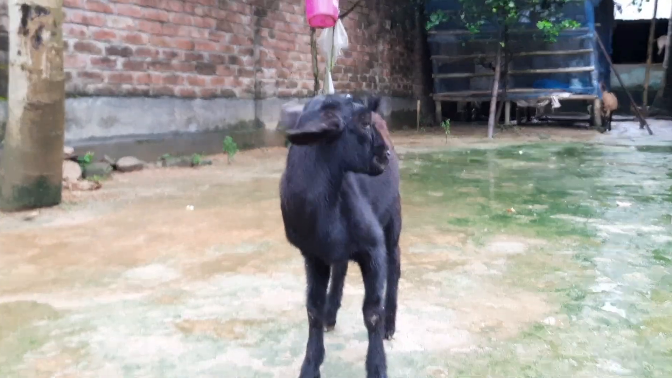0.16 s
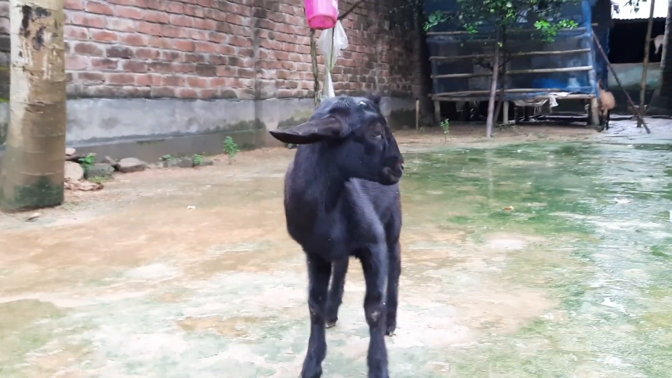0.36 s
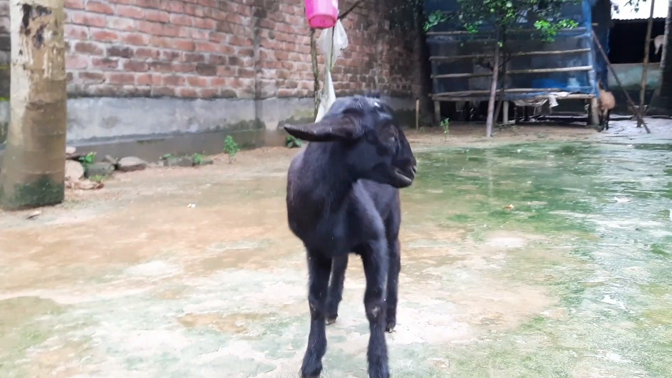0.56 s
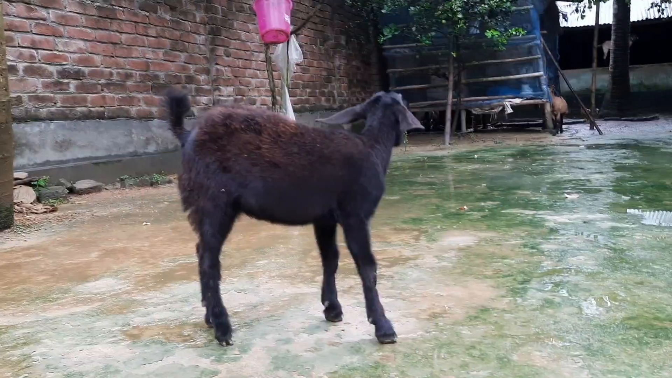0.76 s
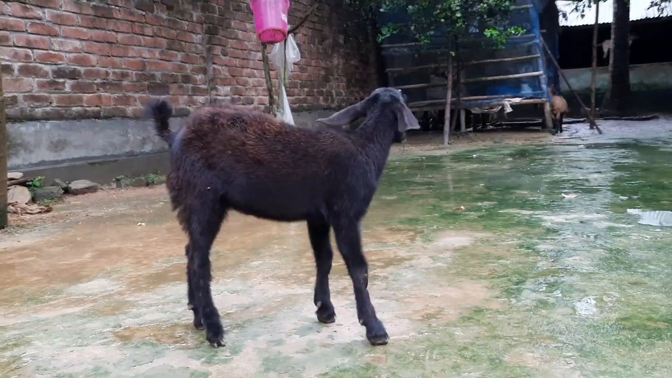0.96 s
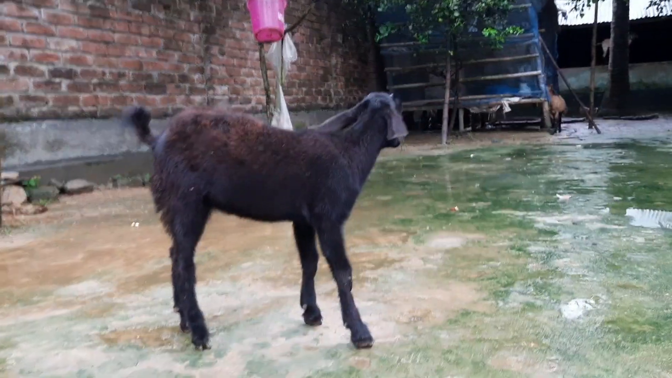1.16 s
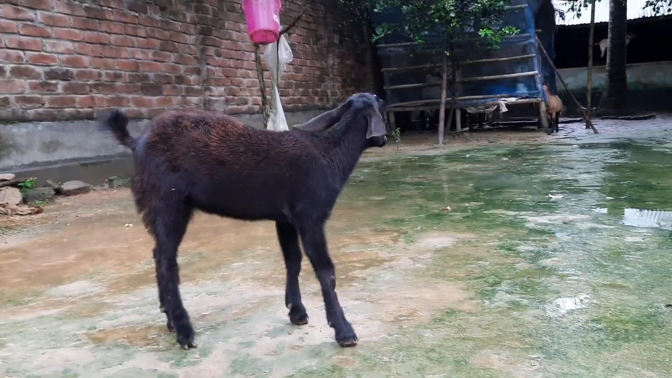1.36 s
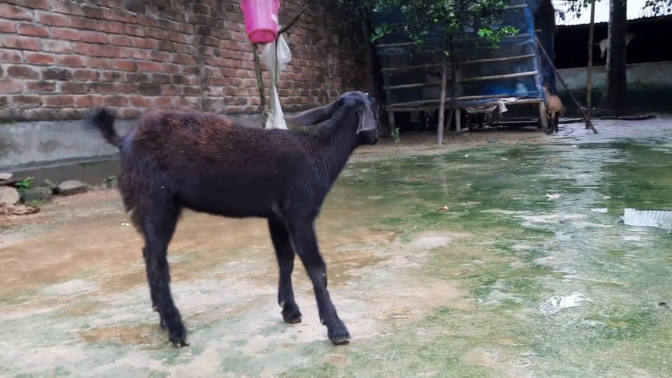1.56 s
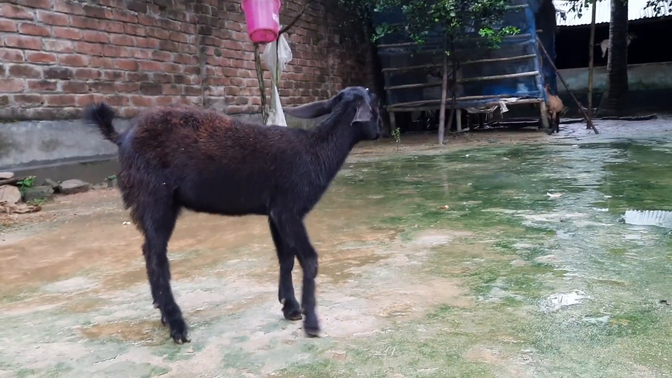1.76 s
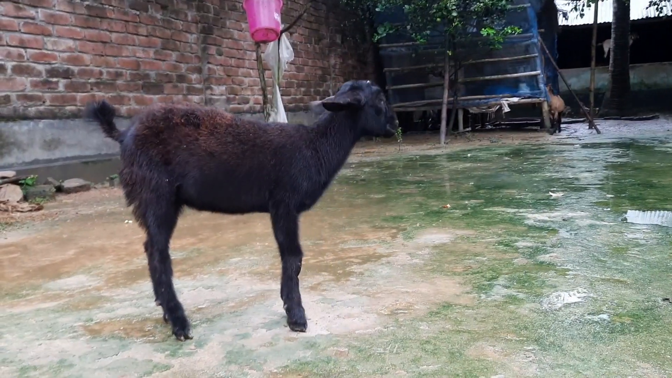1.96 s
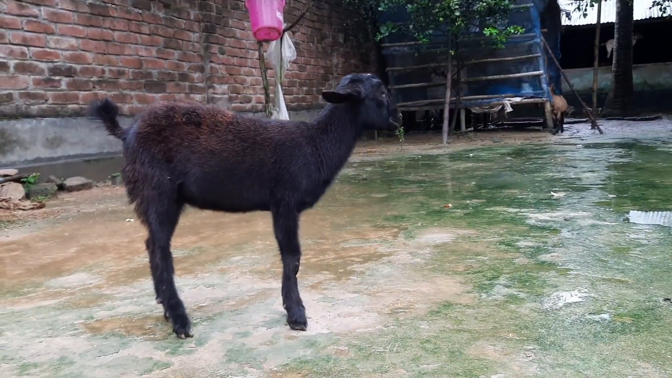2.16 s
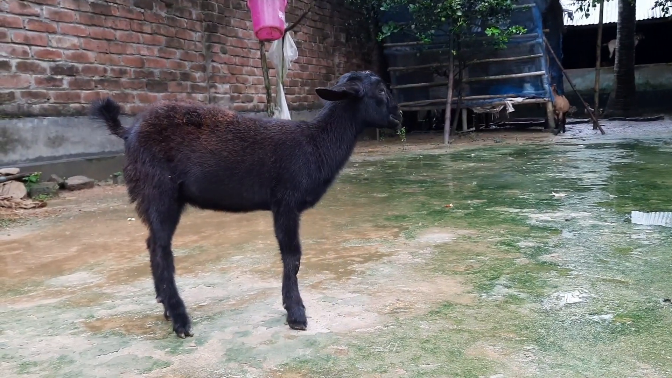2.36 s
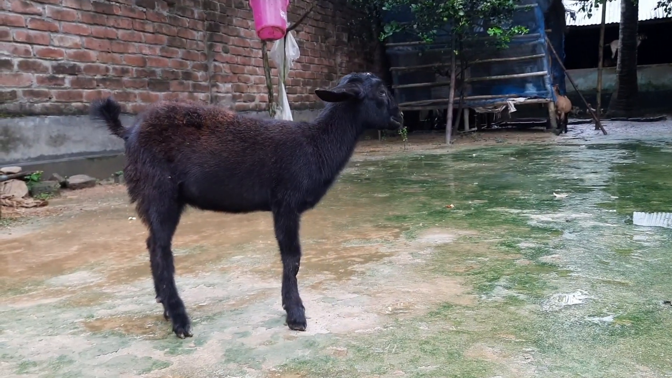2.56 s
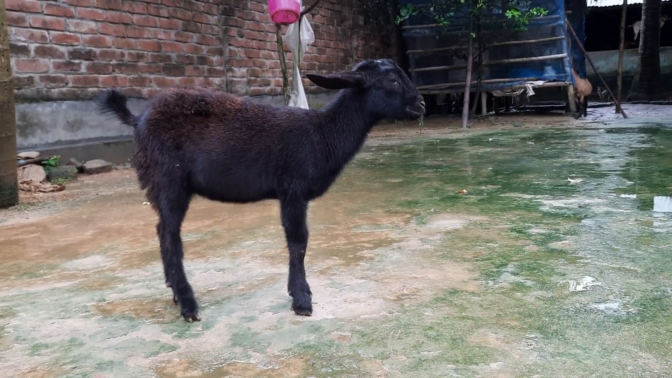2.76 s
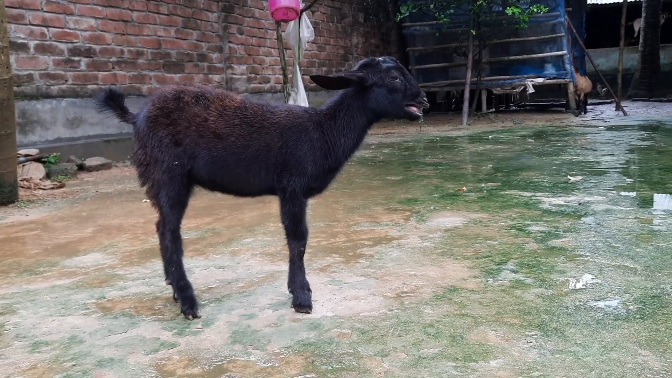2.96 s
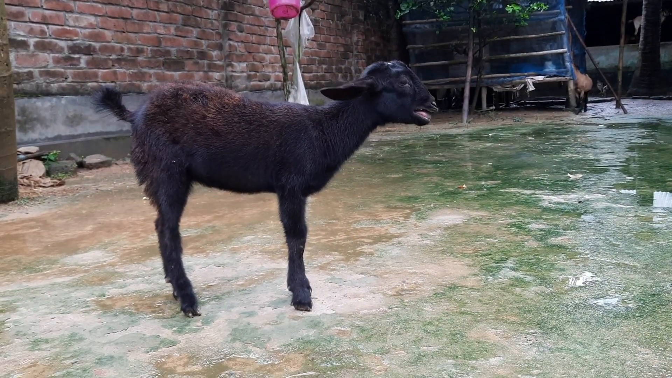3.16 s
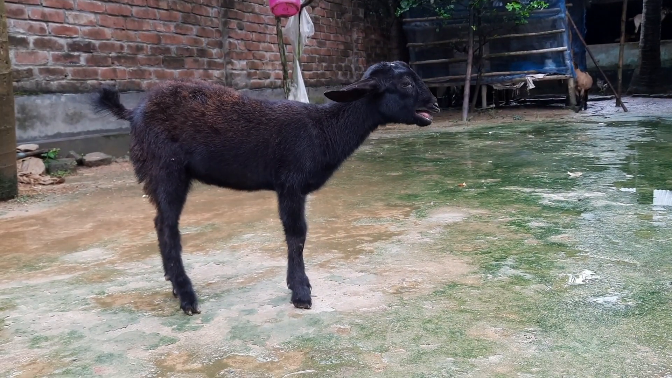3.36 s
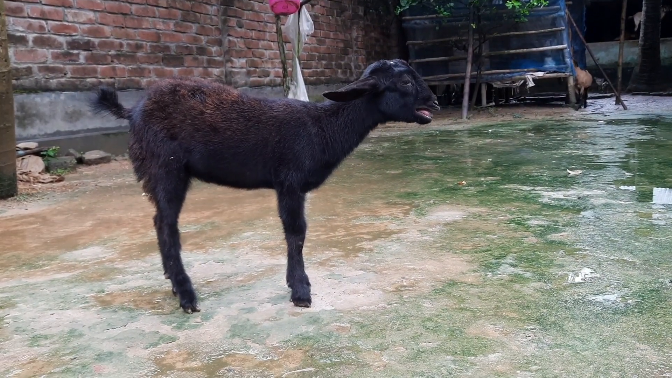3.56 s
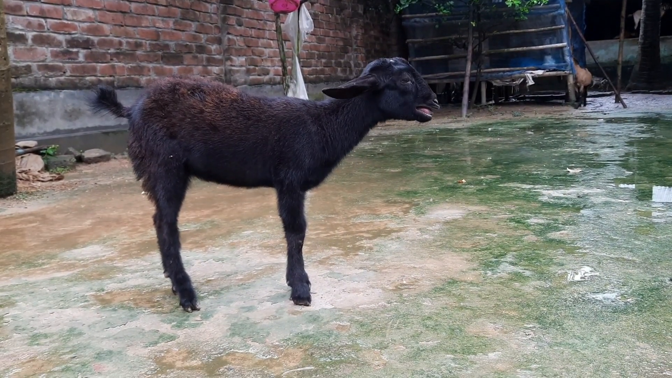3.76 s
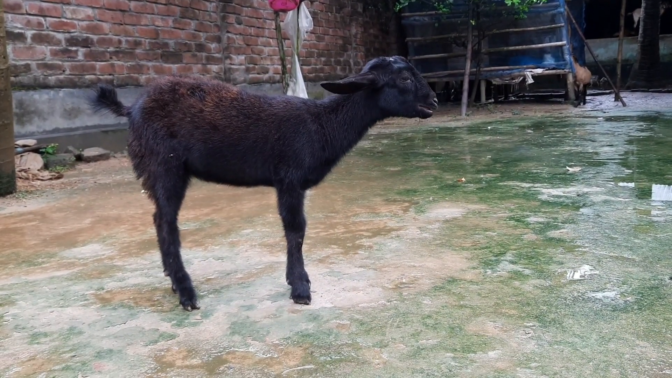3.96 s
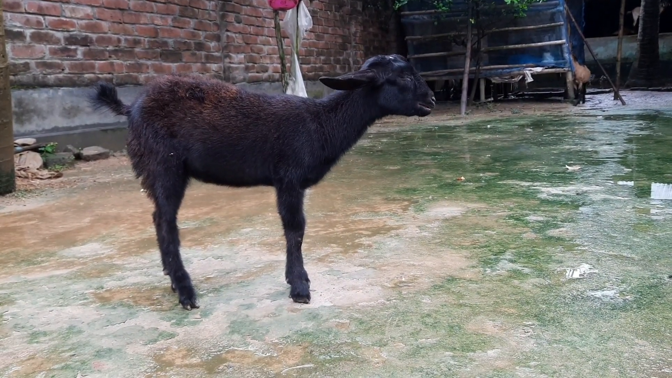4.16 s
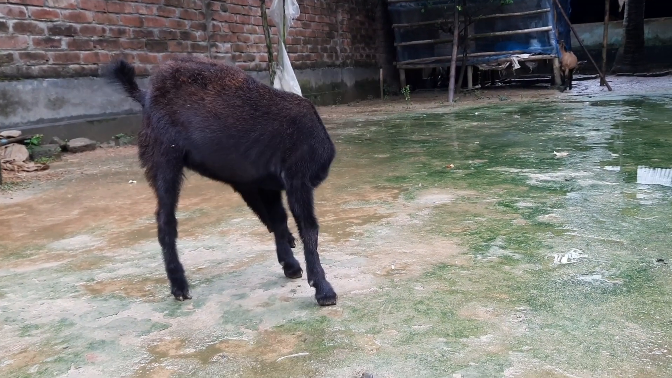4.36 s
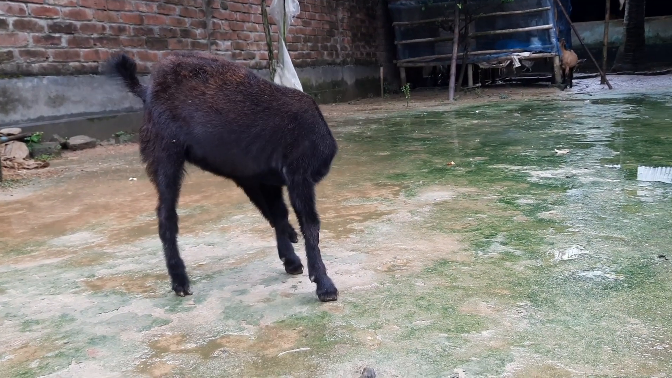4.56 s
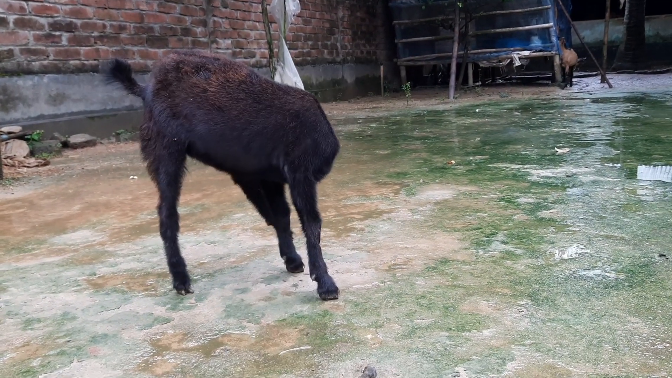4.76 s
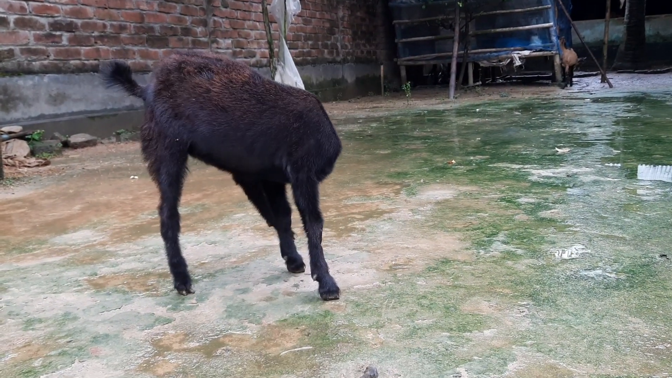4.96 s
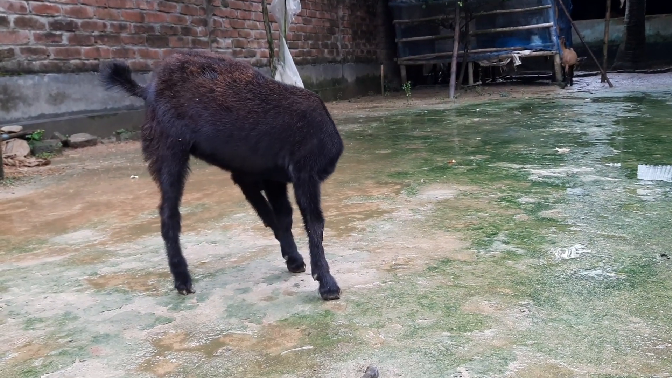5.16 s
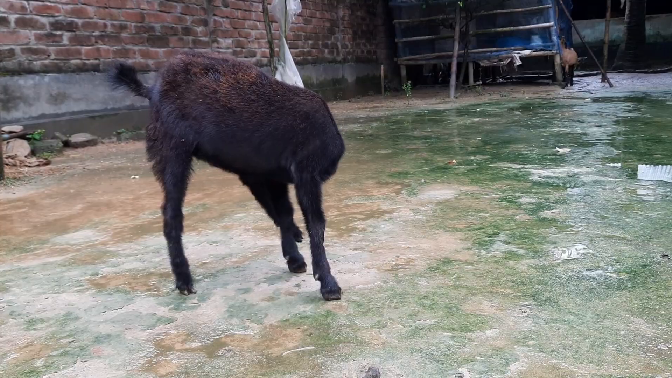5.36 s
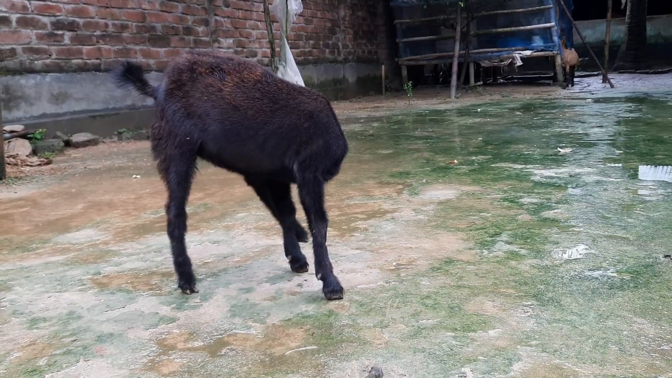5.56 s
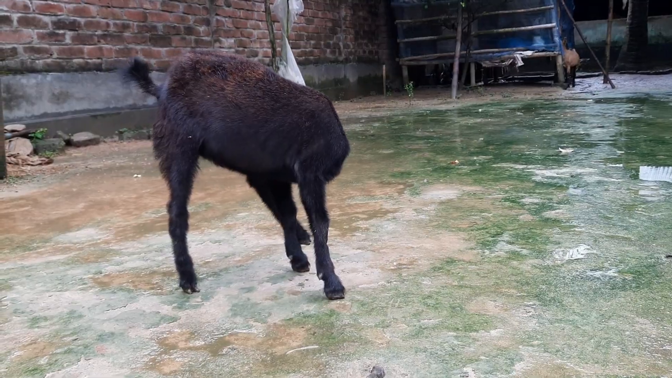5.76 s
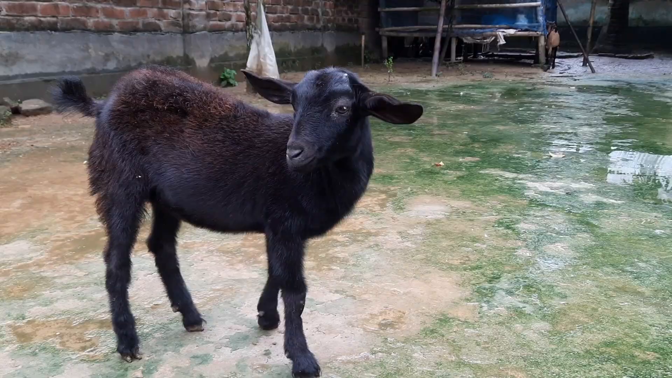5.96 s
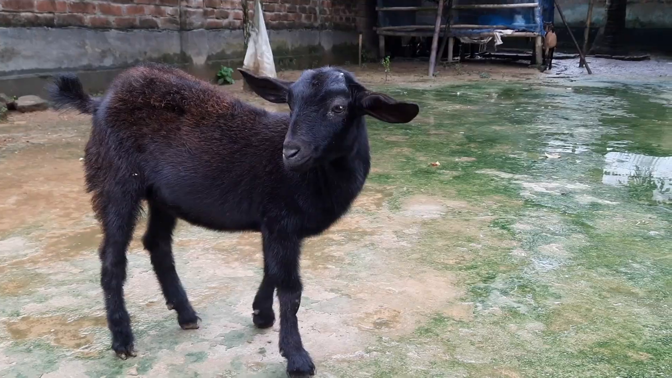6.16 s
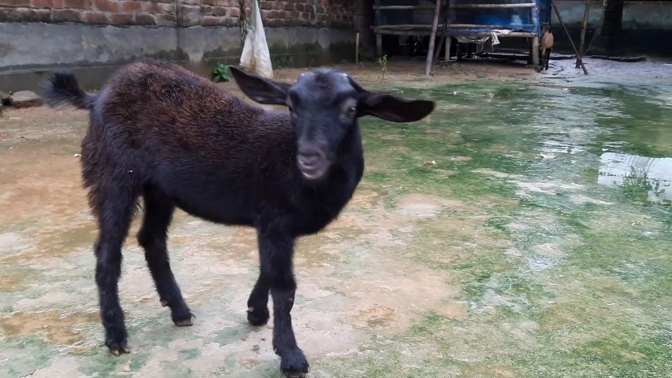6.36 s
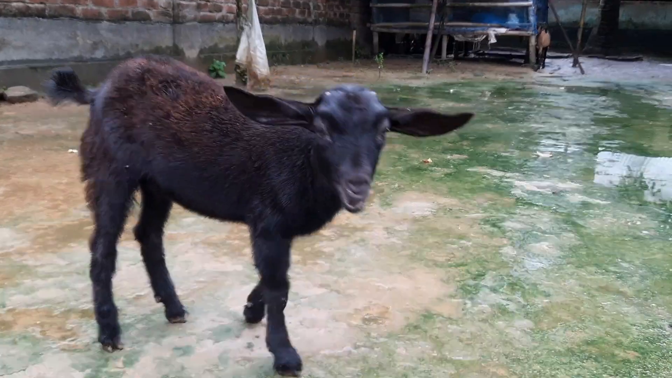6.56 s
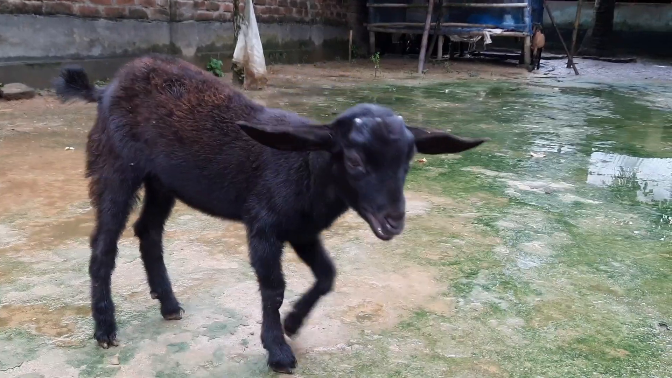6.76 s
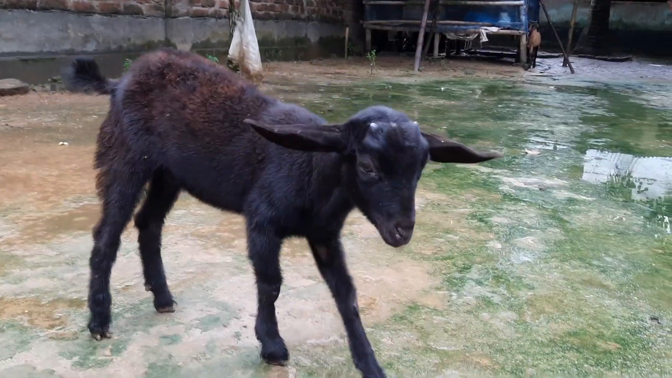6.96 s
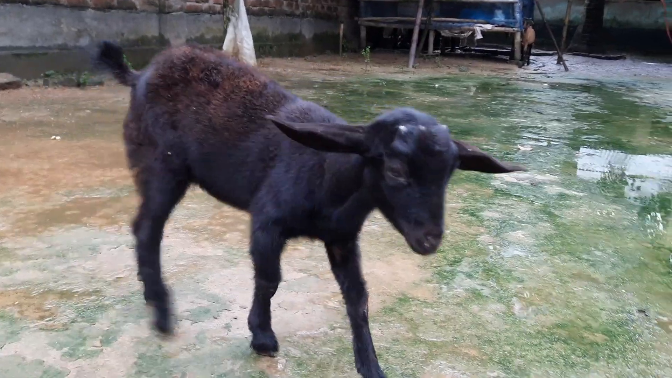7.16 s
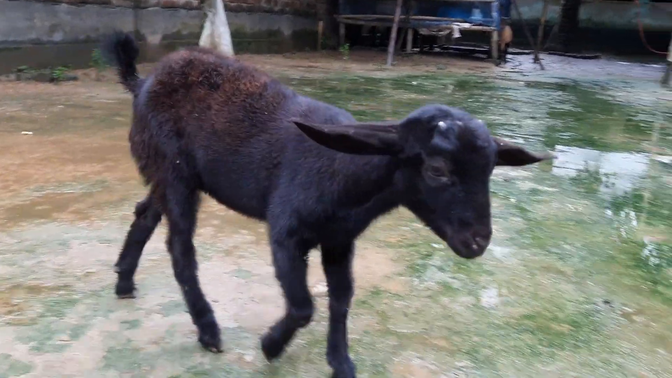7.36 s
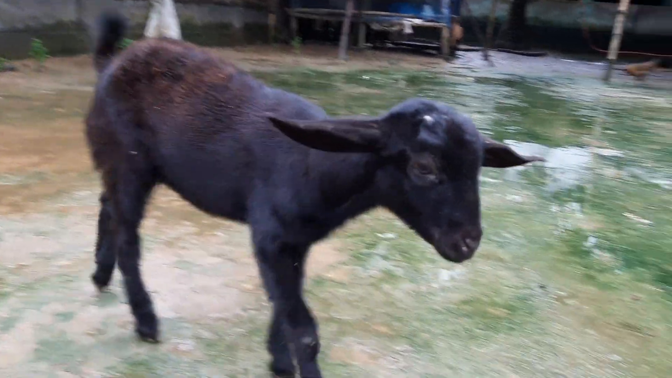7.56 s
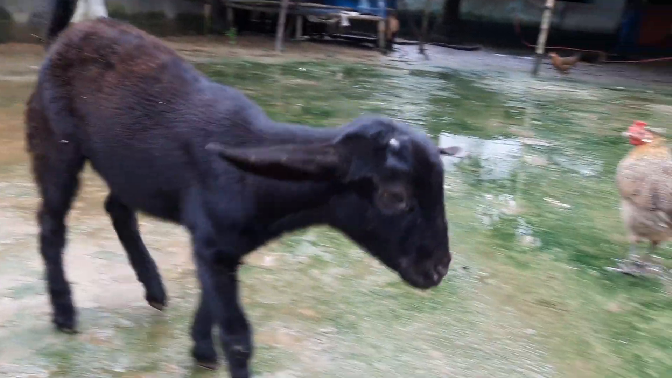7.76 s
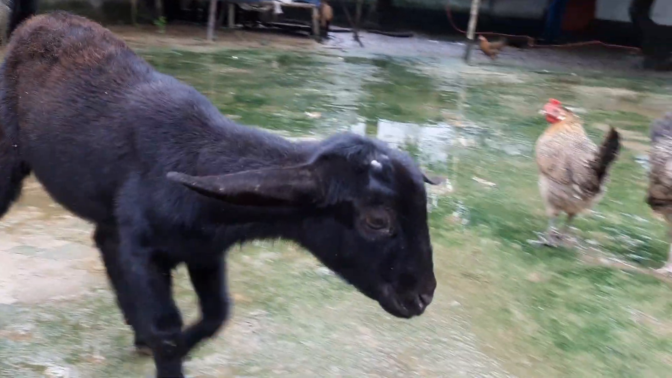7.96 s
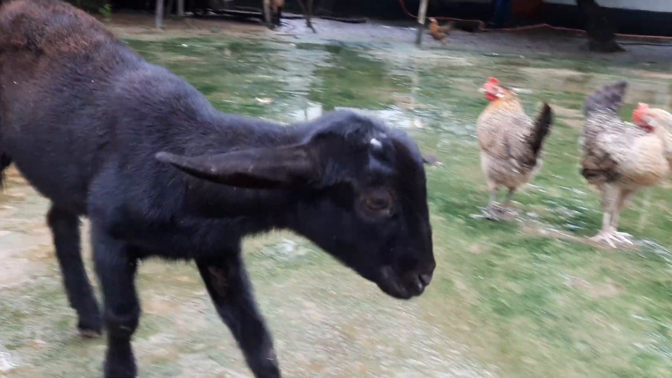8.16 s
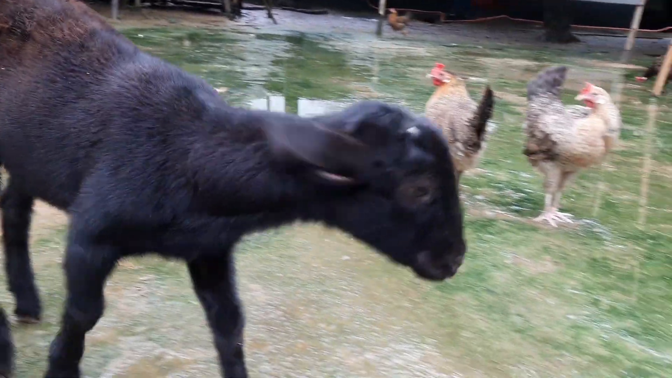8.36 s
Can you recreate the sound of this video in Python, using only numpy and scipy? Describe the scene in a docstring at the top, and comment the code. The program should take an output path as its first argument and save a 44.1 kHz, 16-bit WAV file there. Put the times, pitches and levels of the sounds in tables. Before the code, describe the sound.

The fading echo of an earlier bleat opens over quiet outdoor air and low rumble. A young goat then bleats loudly four times with pauses between, answered by short scattered reflections from brick walls and sheds. Small chicks whistle thinly, hens murmur farther away. The second half has bassy wind buffeting on the phone microphone and a few dry hoof clicks and scuffs.

```python
"""Yard air carries the dying echo of an earlier bleat over a low rumble that swells once and recedes.
Chicks peep now and then throughout as quavering sines; distant fowl call as resonated harmonics.
A goat kid bleats four times, a few steps from a hand-held phone: fold pulses ring its throat; each
bleat starts mouth shut, opens to a piercing tone and sags into a rasp; walls add scattered echoes.
After the second bleat, noise gusts buffet the microphone and hooves tick on the concrete."""
import sys
import numpy as np
from scipy import signal
from scipy.fft import rfft, irfft
from scipy.io import wavfile
from scipy.ndimage import uniform_filter1d

SR = 44100
rng = np.random.default_rng(int(sys.argv[2]) if len(sys.argv) > 2 else 0)


def dump_mix(stems):
    """Bounce the given channels to the path in sys.argv[1] as a 16-bit WAV at rate SR."""
    frames = np.atleast_2d(stems).T  # one column per channel
    limited = np.clip(frames, -1, 1)  # hard clip at full scale
    pcm = np.round(limited * 32767).astype(np.int16)
    wavfile.write(sys.argv[1], SR, pcm)


N = 370440
TIME = np.arange(N) / SR
FREQS = np.fft.rfftfreq(N, 1 / SR)


def undb(db):
    """Decibels to gain."""
    return 10 ** (np.asarray(db) / 20)


def unit(x):
    """Scale to rms 1."""
    return x / np.sqrt(np.mean(x ** 2))


def curves(rows, t):
    """Columns of a table, joined by straight lines at times t."""
    s, *columns = np.transpose(rows)
    return [np.interp(t, s, c) for c in columns]


def colour(points, hz):
    """Gain of a (f/Hz, level/dB) spectrum at the given frequencies."""
    f, db = np.transpose(points)
    return undb(np.interp(np.log(hz + 1), np.log(f), db))


def resonance(hz, centre_hz, width_hz):
    """Complex response of one resonance, gain 1 at its centre."""
    return 1j * hz * width_hz / (centre_hz ** 2 - hz ** 2 + 1j * hz * width_hz)


def noise(response):
    """Two unrelated noises with the given response, rms 1."""
    return unit(irfft(rfft(rng.standard_normal((2, N))) * response, N))


def walk(rate_hz):
    """Smooth random curve, rms 1, moving up to about rate_hz times a second."""
    return unit(irfft(rfft(rng.standard_normal(N)) * np.exp(-(FREQS / rate_hz) ** 2), N))


def yard(x, t60_s, treble_t60_s, build_s, treble_db):
    """Scattered echoes from ground, walls and sheds: decaying noise, different at each microphone."""
    t = TIME[:N // 4]
    grain = rng.standard_normal((2, len(t)))
    low = signal.sosfilt(signal.butter(2, 3500, fs=SR, output="sos"), grain)
    high = signal.sosfilt(signal.butter(2, 3500, "high", fs=SR, output="sos"), grain)
    low_tail = low * undb(-60 * t / t60_s)
    high_tail = high * undb(treble_db - 60 * t / treble_t60_s)
    tail = (low_tail - high_tail) * (1 - np.exp(-t / build_s))
    tail /= np.sqrt(np.sum(tail ** 2) / 2)
    return signal.fftconvolve(x[None], tail, axes=1)[:, :N]


def background():
    """Quiet outdoor air as wavering noise, plus the echo of an earlier bleat as fading noise."""
    # spectrum of the air: f/Hz, level/dB
    air_spectrum = [(120, -24), (200, -3), (998, -22), (3060, -24.5), (3600, -32.5), (4470, -18.5),
                    (4980, -28), (8880, -25.5), (10500, -35.5), (15000, -29)]
    # spectrum of the earlier bleat dying in the yard: f/Hz, level/dB
    echo_spectrum = [(120, -44), (200, -32), (296, -34), (379, -17.5), (635, -35), (1140, -25.5),
                     (3260, -35.5), (3760, -39), (4570, -29.5), (5560, -42), (6640, -33.5), (9140, -51),
                     (14000, -49)]
    air_db, echo_db, echo_t60_s = -72, -41, 0.37
    air = noise(colour(air_spectrum, FREQS)) * undb(air_db + walk(2.9))
    return air + noise(colour(echo_spectrum, FREQS)) * undb(echo_db - 60 * TIME / echo_t60_s)


def rumble():
    """Steady low noise without deep bass, which swells once and slowly recedes."""
    steady_db, left_db = -80, -2
    swell_s, swell_attack_s, swell_db, fade_db_per_s = .68, .03, -57, 4
    age = TIME - swell_s
    swell = undb(swell_db - fade_db_per_s * age) * np.clip(age / swell_attack_s, 0, 1)
    level = np.hypot(undb(steady_db), swell)
    return noise(resonance(FREQS, 86, 180) ** 3) * level * undb([[left_db], [0]])


def chirp(start, length, shares, pitches, swell):
    """One quavering sine; pitch and strength pass through points at shares of its length."""
    u = (TIME - start) / length
    span = (u > 0) & (u < 1)
    shake = unit(uniform_filter1d(rng.standard_normal(N // 16), size=350))[:span.sum()]
    hz = np.interp(u[span], shares, pitches) * (1 + .017 * shake)
    out = np.zeros(N)
    out[span] = np.interp(u[span], shares, swell) * np.sin(2 * np.pi * np.cumsum(hz) / SR)
    return out


def whistle(start, length, early, middle, late, last):
    """One chick note: pitch scoops in, then glides through four pitches as the strength drops away."""
    pitches = [early * .95, early, early * .98, middle, late, last]
    return chirp(start, length, [0, .08, .25, .5, .8, 1], pitches, [0, .7, .7, 1.1, 1.1, .2])


def peep(start, top_hz):
    """One arched chick note: quick rise in pitch, short hold, longer fall."""
    pitches = top_hz * np.array([.68, .97, 1, .72, .5])
    return chirp(start, .14, [0, .15, .35, .58, 1], pitches, [.1, 1.5, .5, 1, .15])


def chicks():
    """Whistles close by, mostly falling, and arched peeps that arrive mostly as echo."""
    # near chick: t/s, length/s, early f/Hz, middle f/Hz, late f/Hz, last f/Hz, level/dB before swell
    whistles = [(0.237, .28, 4960, 4290, 4580, 3630, -59.5), (0.671, 0.32, 4900, 4700, 4720, 3730, -58.5),
                (2.087, 0.29, 4960, 4540, 4310, 3450, -63.5), (2.718, .022, 3274, 3930, 4400, 4560, -59),
                (2.796, .26, 4894, 4810, 4292, 3575, -63.5), (3.957, .27, 5000, 4347, 4010, 3400, -64.5),
                (5.998, 0.039, 4050, 3870, 3610, 3520, -58), (6.995, 0.14, 5140, 4816, 4220, 3180, -62.5),
                (7.868, 0.3, 4676, 4670, 4434, 3300, -59.5)]
    # chick further off: t/s, top f/Hz, level/dB before swell and path gains
    peeps = [(1.778, 4770, -57), (2.085, 4680, -60), (2.404, 4695, -58.5), (4.289, 4570, -68.5),
             (5.39, 4420, -64), (5.761, 4535, -62.5), (7.088, 4720, -70.5), (7.425, 4620, -76.5),
             (7.767, 4615, -75)]
    near_echo_db, far_direct_db, far_echo_db, left_db = -4, -7, 1, -3
    near = sum(undb(db) * whistle(*note) for *note, db in whistles)
    far = sum(undb(db) * peep(s, top) for s, top, db in peeps)
    to_yard = undb(near_echo_db) * near + undb(far_echo_db) * far
    echo = yard(to_yard, t60_s=0.2, treble_t60_s=0.53, build_s=0.0014, treble_db=-4.5)
    both = near + undb(far_direct_db) * far + echo
    return both * undb([[left_db], [0]])


def fowl(row, throat):
    """A reedy call: seven harmonics weighted by one throat resonance; pitch bends once, level fades."""
    attack_s = 0.15
    start, turn, end, first_hz, turn_hz, last_hz, db, fade = row
    hz, width, hoarse = throat
    span = (TIME > start) & (TIME < end)
    t = TIME[span]
    pitch = np.interp(t, [start, turn, end], [first_hz, turn_hz, last_hz])
    shake = unit(uniform_filter1d(rng.standard_normal(N // 4), size=200))[:len(t)]
    phase = 2 * np.pi * np.cumsum(pitch * (1 + hoarse * shake)) / SR
    reed = sum(np.sin(k * phase) * abs(resonance(k * pitch, hz, width)) for k in range(1, 8))
    out = np.zeros(N)
    out[span] = reed * undb(db - fade * (t - start)) * np.minimum((t - start) / attack_s, 1) ** 2
    return out


def flock():
    """Fowl call from beyond the yard, partly as echo."""
    # calls: start t/s, turn t/s, end t/s, first f/Hz, turn f/Hz, last f/Hz,
    # level/dB before path gains, fade/(dB/s)
    call_rows = [(0.636, 0.92, 1.62, 394.8, 458, 373.6, -50, 3.5),
                 (1.504, 1.833, 2.06, 500.5, 532.7, 514, -31.5, 82.5),
                 (6.04, 6.202, 6.32, 376.1, 403, 424, -65, 2), (8.04, 8.19, 8.4, 583, 599, 691, -69, 3)]
    # voice of each call: throat f/Hz, width/Hz, hoarseness/(share of pitch)
    fowl_throats = [(880, 480, 0.026), (810, 430, .1), (1172, 600, .02), (1300, 820, 0.0281)]
    direct_db, echo_db = -4, -6
    calls = sum(fowl(*call) for call in zip(call_rows, fowl_throats))
    echo = yard(calls, t60_s=.45, treble_t60_s=.35, build_s=.01, treble_db=-6)
    return undb(direct_db) * calls + undb(echo_db) * echo


def gesture(t, pitch, call, hoarseness):
    """Register levels/dB and roughness: mouth opens, air runs out, folds slacken as the pitch sags."""
    # 1st, 2nd, 3rd harmonic, throat ring, treble edge: shut level/dB, jaw-drop level/dB,
    # sag/(dB/octave), share of fade, attack steepness; first three scaled by each bleat's factors
    registers = [(-1, 2, -1.5, 0.13, 0.27), (-27.5, 4.5, -42.5, .6, 1.3), (-27, -7.5, -13.5, 0.57, 1.3),
                 (-30.5, -7.5, -36, 0.93, 2.1), (-33, -1.5, -19.5, 0.98, 1.5)]
    # voice cracks: t/s, 1/e half-length/s, level change/dB, added roughness
    cracks = [(6.413, .009, -7, .2), (6.82, .016, -.5, .25)]
    attack_s, opening_s = .065, 0.0071  # voice swells behind shut lips, which then part quickly
    jaw_lag_s, jaw_s = 0.031, 0.051  # jaw drops just after the lips part
    slack_octaves = .28  # sag at which the folds are fully slack
    opens, *full_db, fade, nasal, shut_depth, jaw_depth, sag_depth = call
    age = t - opens
    shut = .5 - .5 * np.tanh(age / (2 * opening_s))
    jaw = np.exp(-abs(age - jaw_lag_s) / jaw_s)
    octaves = np.log2(pitch.max() / pitch)
    sag = octaves * (t > t[pitch.argmax()])
    swell_db = 20 * np.log10(np.clip((t - t[0]) / attack_s, .02, 1))
    levels = []
    for db, (shut_db, jaw_db, sag_db, share, steepness) in zip(full_db, registers):
        mouth_db = shut_db * shut_depth * shut + jaw_db * jaw_depth * jaw
        decline_db = sag_db * sag_depth * sag - share * fade * np.maximum(age, 0)
        levels.append(db + steepness * swell_db + mouth_db + decline_db)
    levels = np.array(levels)
    levels[0] += nasal * np.minimum(octaves, .5)
    clear, hoarse = hoarseness
    slack = np.sin(np.pi / 2 * np.minimum(sag / slack_octaves, 1)) ** 2
    rough = clear + (hoarse - clear) * np.maximum(shut, slack)
    for s, length, dip_db, rasp in cracks:
        crack = np.exp(-((t - s) / length) ** 2)
        levels, rough = levels + dip_db * crack, rough + rasp * crack
    return levels, rough


def bleat(rows, call, hoarseness, throat, lag_ms, sides):
    """Fold pulses (stacked harmonics) ring the throat; hoarseness shakes cycles and adds turbulence."""
    glide_s = 0.02  # the folds cannot turn their pitch faster
    jitter, waver_share, rasp_db, low_rasp_db, tremble_db = .033, .0027, -5.5, -18.5, 1.03
    span = (TIME >= rows[0][0]) & (TIME <= rows[-1][0])
    t = TIME[span]
    f = np.fft.rfftfreq(len(t), 1 / SR)
    pitch = uniform_filter1d(curves(rows, t)[0], size=int(glide_s * SR), mode="nearest")
    (*low_db, ring_db, edge_db), rough = gesture(t, pitch, call, hoarseness)

    def shape(x, response):
        """Filter a signal as long as the bleat."""
        return irfft(rfft(x) * response, len(t))

    def chance(rate_hz):
        """Random values at rate_hz, joined by straight lines."""
        return 1.2 * np.interp((t - t[0]) * rate_hz, np.arange(2048), rng.standard_normal(2048))

    def steady(x):
        """Even out the loudness to rms 1."""
        return x / np.sqrt(uniform_filter1d(np.mean(x ** 2, axis=0), size=2000) + 1e-12)

    def flutter(k):
        """Harmonic k wanders in strength and phase as the head trembles; high ones differ per ear."""
        shared = np.array([chance(30) + 1j * chance(22)])
        own = np.array([chance(9) + 1j * chance(9) for ear in range(2)])
        return np.exp(np.clip(3.5 * rough, .22, .34) * shared + min(k / 45, .5) * own)

    waver = waver_share * chance(40)
    phase = 2 * np.pi * np.cumsum(pitch * (1 + jitter * rough * chance(800) + waver)) / SR
    tract = 0
    for k, (hz, width, db) in enumerate(throat):
        peak = resonance(f, hz, width)
        tract = tract + (-1) ** k * undb(db) * peak * abs(peak) ** .3
    tract = tract / (1 + (f / 13000) ** 8)
    pulses = unit(sum(np.real(np.exp(1j * k * phase) * flutter(k)) for k in range(4, 36)))
    puffs = unit(rng.standard_normal(N // 4)[:len(t)] * (1 + 0.87 * np.cos(phase)))
    # slack folds stay open longer: they leak turbulence and damp the throat's sharp peaks
    damping = .3 * (abs(tract) + .03) ** -.55
    slack = np.clip(2.5 * rough, 0, 1)
    leaky = slack * pulses + undb(rasp_db) * rough * puffs
    source = (1 - slack) * pulses + shape(leaky, damping)
    upper = 1 / (1 + (1750 / (f + 1)) ** 16)
    treble = 1 / (1 + (5400 / (f + 1)) ** 24)
    voice = steady(shape(source, tract * upper * (1 - treble))) * undb(ring_db - 0.02)
    voice += steady(shape(source, tract * treble)) * undb(edge_db)
    # jaw and lips hand the strength from the fundamental to harmonics 2 and 3 as the mouth opens
    for k, db in enumerate(low_db):
        tone = np.cos((k + 1) * phase - (k - 1) * np.pi / 2)
        voice += np.sqrt(2) * undb(db + tremble_db * chance(22)) * tone
    low_rasp = unit(shape(puffs, resonance(f, 1700, 700) ** 2))
    voice += low_rasp * rough * undb(np.max(low_db, axis=0) + low_rasp_db)
    ends = np.clip(np.minimum((t - t[0]) / .008, (t[-1] - t) / .02), 0, 1)
    voice *= np.exp(.3 * rough * chance(350)) * ends
    ratio = colour(sides, f)  # left over right
    left = ratio * np.exp(-2j * np.pi * f * lag_ms / 1000)
    ears = np.array([left, np.ones(len(f))]) * 2 / (1 + ratio)
    out = np.zeros((2, N))
    out[:, span] = shape(voice, ears)
    return out


def kid():
    """Four bleats, each with its own pitch gesture, throat shape and direction."""
    # pitch of each bleat: t/s, f/Hz
    pitch_tracks = [
        [(0.765, 414.4), (0.807, 345.6), (0.862, 451), (0.965, 538.3), (1.049, 556.6), (1.218, 570.4),
         (1.401, 554), (1.478, 522.4), (1.557, 468.7), (1.635, 330)],
        [(2.905, 454), (2.951, 552), (3.062, 568.5), (3.207, 576.2), (3.704, 583.5), (3.746, 559), (3.781, 542),
         (3.838, 480.4), (3.915, 308.3)],
        [(4.6, 374), (4.644, 369.6), (4.677, 475.7), (4.754, 550.4), (4.883, 577.4), (5.049, 590.9),
         (5.151, 566), (5.206, 515), (5.255, 447.7), (5.315, 313)],
        [(6.285, 488), (6.315, 432), (6.378, 520), (6.401, 512), (6.482, 576.4), (6.543, 564.7), (6.68, 557.8),
         (6.755, 540), (6.885, 467), (6.96, 353.2)],
    ]
    # mouth opens t/s; full voice: 1st, 2nd, 3rd harmonic, throat ring, treble edge level/dB;
    # fade/(dB/s) as the air runs out, nasal hum/(dB/octave) as pitch sinks; shut, jaw, sag factors
    bleat_rows = [(0.935, -40, -31, -25.5, -18.5, -36, 5.2, 3, 0.88, 1.36, 1.17),
                  (2.93, -46.5, -20.5, -25.5, -15.5, -25.5, 12.34, -6, 0.83, 0.98, 0.92),
                  (4.73, -45.5, -20.5, -38.5, -16, -35, 12.9, 22, 0.93, .94, 1.015),
                  (6.455, -37, -19, -22, -13.5, -25, 27.4, -31.5, 0.78, 0.73, 0.75)]
    # roughness at full voice, roughness with mouth shut or folds slack (0-1)
    roughness = [(.055, .45), (.024, .33), (.025, .8), (.028, .2)]
    # throat and mouth resonances per bleat as the head turns: f/Hz, width/Hz before sharpening, level/dB
    throats = [
        [(1610, 250, -8), (3160, 380, -7), (4660, 180, 0), (5310, 800, -22), (7460, 1500, -29),
         (12200, 2400, -45)],
        [(1610, 250, -11), (2900, 230, -10), (4310, 180, 0), (5830, 500, -20), (7310, 490, -20),
         (12000, 2200, -47)],
        [(1610, 500, -21), (2800, 320, 0), (4420, 450, -3), (5590, 280, -9), (7600, 1900, -22),
         (12200, 2200, -30)],
        [(1190, 200, -16), (3100, 600, -1), (4500, 390, 0), (5480, 280, -6), (7650, 1300, -13),
         (12000, 2400, -26)],
    ]
    # delay of each bleat at the left microphone: lag/ms
    lags_ms = [0.04, 0.038, -0.098, -0.046]
    # left minus right per bleat: f/Hz, level/dB
    side_spectra = [
        [(60, -3.5), (110, 3.5), (200, 1.5), (380, -2.5), (700, -6.5), (1290, -8), (2380, -5), (4400, -3),
         (8120, -5), (15000, 6)],
        [(60, -2), (110, -1), (200, 1.5), (380, -8.5), (700, 1), (1290, -8), (2380, -5.5), (4400, -2.5),
         (8120, -3.5), (15000, 7)],
        [(60, -11.5), (110, -8.5), (200, -8), (380, -2), (700, -8), (1290, -7.5), (2380, -1), (4400, -6),
         (8120, -9.5), (15000, 18.5)],
        [(60, -16.5), (110, -17), (200, -0.5), (380, -7.5), (700, 1.5), (1290, -8), (2380, -6), (4400, -2.5),
         (8120, -6), (15000, 1.5)],
    ]
    calls = zip(pitch_tracks, bleat_rows, roughness, throats, lags_ms, side_spectra)
    return sum(bleat(*call) for call in calls)


def walls(goat):
    """Echoes of the kid's right-ear signal off the brick wall and the sheds behind it."""
    # wall, sheds: level/dB, t60/s, treble t60/s, build-up/s, treble level/dB
    wall_rows = [(-17, .27, .33, .003, 4), (-40, .8, .7, .02, 0)]
    return sum(undb(db) * yard(goat[1], *decay) for db, *decay in wall_rows)


def wind():
    """Gusts rise fast, hold and die back; noise differs per microphone port, buffeting is shared."""
    # gusts: t/s, length/s, level/dB before overall gain
    gusts = [(4.22, .27, -47), (4.5, .14, -42), (4.66, .11, -55.5), (4.8, .24, -62), (4.95, .1, -45.5),
             (5.05, .13, -45), (5.3, .09, -46.5), (5.48, .5, -46), (6.04, .09, -63), (6.32, .26, -60),
             (6.41, .08, -49.5), (6.6, .6, -63), (7.22, .55, -78.5), (7.79, .6, -59), (7.88, .08, -50.5),
             (8.11, .1, -50)]
    # spectrum before the 600 Hz roll-off: f/Hz, level/dB
    wind_colour = [(15, -45.5), (25, -17.5), (54, -1.5), (107, -2), (129, -7), (221, -22.5), (267, -22),
                   (307, -31), (500, -29), (650, -63.5), (1100, -120)]
    attack_s, release_s = 0.0091, 0.026
    buffet_db, gain_db, left_db = 3, 1, -2
    power = 0
    for s, length, db in gusts:
        rise = np.clip((TIME - s) / attack_s, 0, 1)
        release = np.exp(-np.clip(TIME - s - length, 0, 1) / release_s)
        power = power + (undb(db) * rise * release) ** 2
    level_db = gain_db + buffet_db * walk(23) + np.array([[left_db], [0]])
    eddies = noise(colour(wind_colour, FREQS) / (1 + (FREQS / 600) ** 4))
    return eddies * np.sqrt(power) * undb(level_db)


def hooves():
    """Ticks and scuffs on concrete: resonant noise bursts with sudden onset and exponential decay."""
    # ticks: t/s, centre f/Hz, width/Hz of each of two passes, decay/s, level/dB
    ticks = [(4.3, 1704, 595, .08, -72), (4.43, 2116, 906, 0.055, -67.5), (5.56, 1843, 705, 0.066, -68),
             (5.737, 1750, 602, 0.08, -60), (5.789, 9170, 6080, 0.0044, -61),
             (5.989, 1463, 4020, 0.0015, -55.5), (7.887, 1210, 4010, 0.0015, -60),
             (7.902, 1217, 4030, 0.0017, -68)]
    out = np.zeros(N)
    for s, hz, width, decay, db in ticks:
        grit = noise(resonance(FREQS, hz, width) ** 2)[0]
        out += grit * undb(db) * (TIME >= s) * np.exp(-abs(TIME - s) / decay)
    return out


def scene():
    """The kid close by, with the yard and its fowl around it."""
    surroundings = background() + rumble()
    birds = chicks() + flock()
    goat = kid()
    return surroundings + birds + goat + walls(goat) + wind() + hooves()


def record(dry):
    """The phone cuts the top: steep elliptic low-pass."""
    top_hz = 15500
    return signal.sosfilt(signal.ellip(8, .2, 80, top_hz, fs=SR, output="sos"), dry)


dry = scene()
out = record(dry)
dump_mix(out)
```